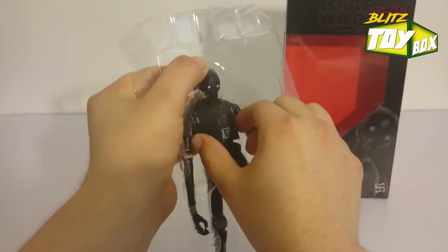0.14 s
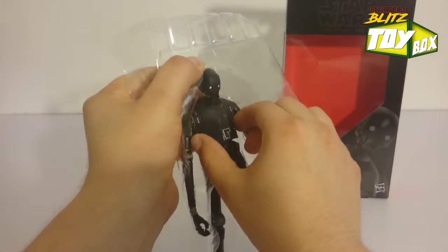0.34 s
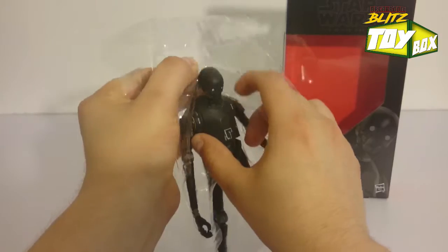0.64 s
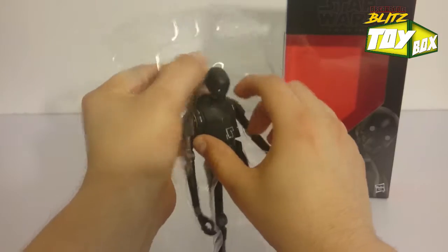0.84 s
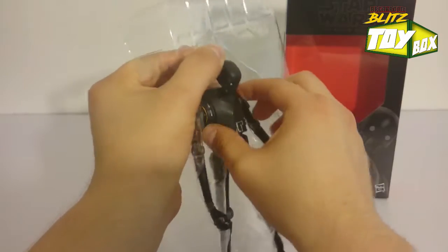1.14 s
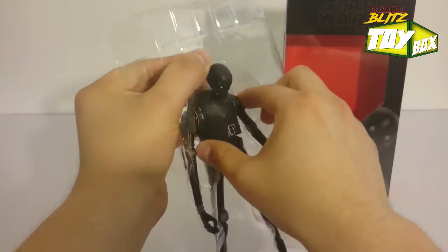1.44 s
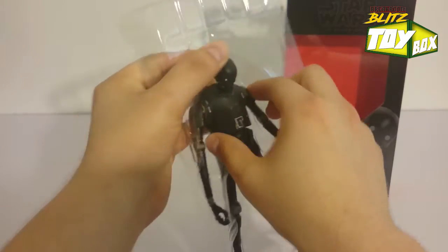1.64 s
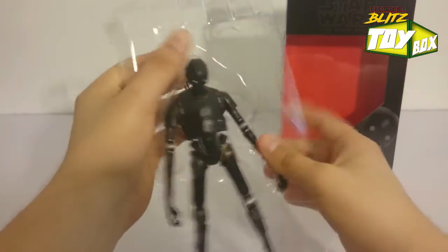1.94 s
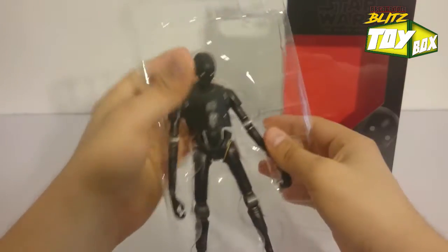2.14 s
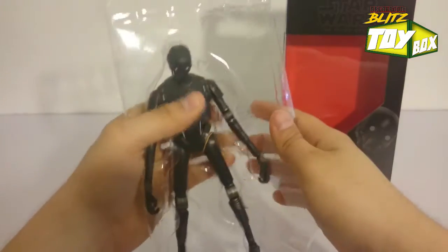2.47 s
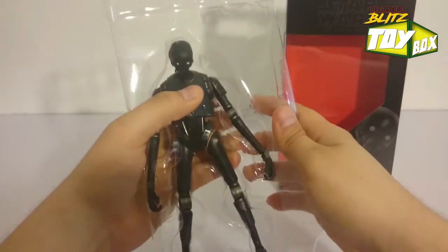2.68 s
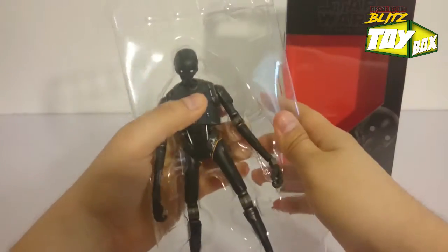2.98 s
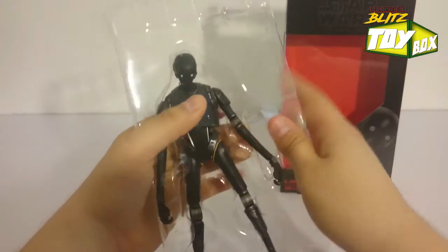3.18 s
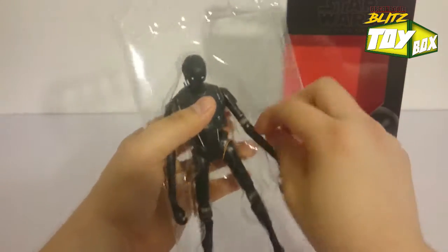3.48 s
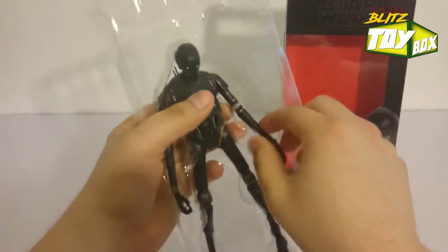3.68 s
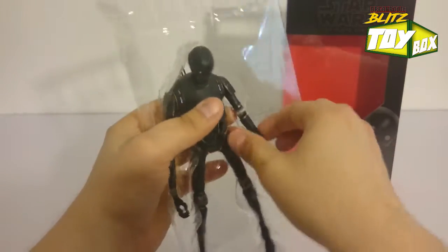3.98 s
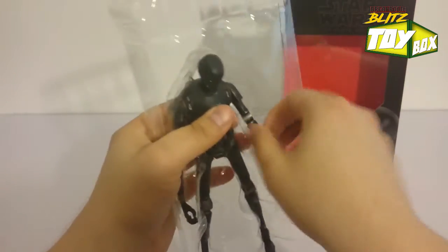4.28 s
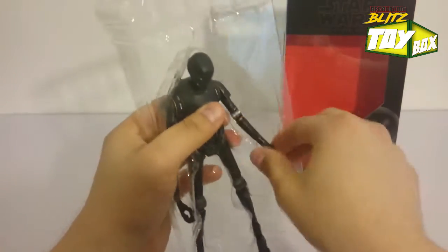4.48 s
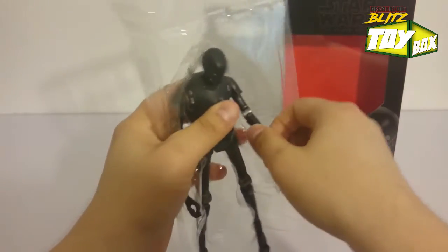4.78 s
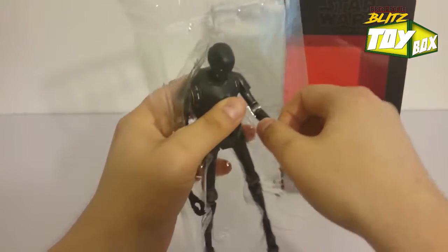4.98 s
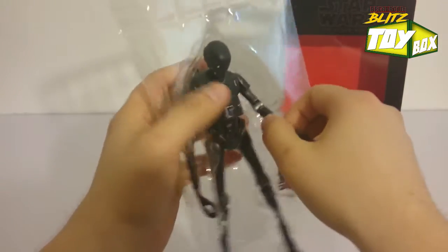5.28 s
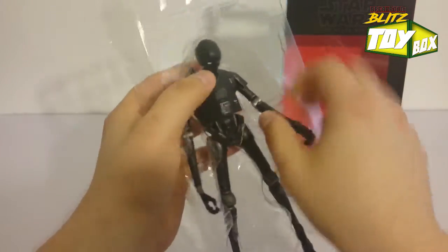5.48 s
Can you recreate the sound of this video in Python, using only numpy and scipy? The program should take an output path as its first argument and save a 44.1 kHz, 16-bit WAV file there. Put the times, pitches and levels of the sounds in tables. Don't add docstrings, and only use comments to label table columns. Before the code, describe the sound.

Brittle plastic buckles and crackles within arm's reach, in wide stereo. Hard irregular snaps with small folds and hollow thuds open the scene, ease off around two seconds, then build again to sharper, brighter cracks past three seconds with slight low bumps through the table. The last second or so is mostly light, scattered crinkling. Small indoor room, short reverberation, faint background noise, no speech.

```python
import sys
import numpy as np
from scipy import signal
from scipy.fft import rfft, irfft, next_fast_len
from scipy.io import wavfile

SR = 44100
rng = np.random.default_rng(int(sys.argv[2]) if len(sys.argv) > 2 else 0)


def field_ratio(decibels):
    return 10 ** (np.asarray(decibels, dtype=float) / 20)


def int16_out(signal):
    q = np.round(np.clip(np.atleast_2d(signal).T, -1, 1) * 32767)
    wavfile.write(sys.argv[1], SR, q.astype(np.int16))


N = 247842


def unit(x):
    return x / np.sqrt(np.mean(x ** 2) + 1e-20)


def along(points, hz):
    f, v = np.transpose(points)
    return np.interp(np.log(hz + 1), np.log(f + 1), v)


def filtered(x, response):
    m = 2 * next_fast_len(N // 2 + 4096)
    return irfft(rfft(x, m) * response(np.fft.rfftfreq(m, 1 / SR)), m)[..., :N]


def causal(db):
    cep = irfft(np.log(field_ratio(db)))
    half = len(cep) // 2
    fold = np.r_[1, np.full(half - 1, 2), 1, np.zeros(half - 1)]
    return np.exp(rfft(cep * fold))


TRAY_MODES = [600, 900, 1220, 1800, 2400, 3120, 3900, 6100]


def bursts(ring_hz, t60_s, ring_db, size=1024):
    t, f, count = np.arange(size) / SR, np.fft.rfftfreq(size, 1 / SR), len(ring_hz)
    crack = rng.standard_normal((count, 2, size))
    pick = rng.random((count, len(TRAY_MODES) + 1))
    jerks = np.repeat(rng.standard_normal((count, 1, size // 16)), 16, -1)
    spikes = field_ratio(3 * jerks)
    life = t60_s * field_ratio(6 * (pick[:, 0] - 1.5))[:, None, None]

    def dying(span):
        return rfft(crack * spikes * field_ratio(-60 * t / span) * t / span ** 2.08)

    def mode(hz):
        width = hz / 11
        return 1j * f * width / (hz ** 2 - f ** 2 + 1j * f * width)

    stiff = 1 / (1 + (3000 / (f + 1)) ** 2)
    spectrum = stiff * dying(life) + (1 - stiff) * dying(1.43 * life)
    spectrum = spectrum / (abs(spectrum) + 1e-6) ** 0.16
    tray = field_ratio(-1 - 15 * pick[:, 1:]) @ mode(np.array(TRAY_MODES)[:, None])
    panel = field_ratio(ring_db) * mode(ring_hz[:, None])
    spectrum = spectrum * (1 + tray + panel)[:, None]
    return f, spectrum / np.sqrt(np.mean(abs(spectrum) ** 2, (1, 2), keepdims=True))


# [centre f/Hz, spread over the band level/dB per Hz]
FOLD_BANDS = [(800, -17), (2700, -35), (6800, -30), (12500, -23.5)]


def balance(f, db, crisp_db, ring_hz):
    octaves = np.log2(ring_hz / 1000)
    thump = -8.5 - 0.14 * (db + 16.0) - 5 * octaves + 0.086 * crisp_db
    edge = -18.5 + 1.22 * crisp_db + 0.33 * octaves
    hz, spread_db = np.transpose(FOLD_BANDS)
    levels = db[:, None] + np.transpose([thump, 0 * db, crisp_db, edge]) + spread_db
    return np.array([along(np.transpose([hz, row]), f) for row in levels])


def laid(times, spectra, colour_db):
    even = spectra / (abs(spectra) + 1e-6) ** 0.41
    coloured = np.concatenate([spectra, even], 1) * field_ratio(colour_db)[:, None]
    lead = 64
    waves = np.roll(irfft(coloured), lead, -1)
    starts = np.round(times * SR).astype(int)[:, None]
    at = (starts + np.arange(waves.shape[-1])).ravel()
    return np.array([np.bincount(at, waves[:, k].ravel(), N + SR)[lead:N + lead] for k in range(4)])


# [f/Hz, level/dB per Hz]
HUSH_COLOUR = [(30, 6), (60, -3), (120, -14.5), (300, -7), (4800, -14), (16000, -34.5)]


def hush():
    def colour(hz):
        return field_ratio(along(HUSH_COLOUR, hz)) * (hz > 15)
    return field_ratio(-60.5) * unit(filtered(rng.standard_normal((2, N)), colour))


# [t/s, effort level/dB]
HAND_EFFORT = [(0.0, -21), (0.8, -29.5), (1.63, -39), (1.8, -62), (2.2, -35), (2.8, -37), (3.3, -23.5),
               (3.75, -38), (4.05, -29.5), (4.3, -41), (4.9, -43.5), (5.62, -51)]
# [from t/s, to t/s]
STILL_HANDS = [(0, .04), (.38, .465), (1.0, 1.022), (1.07, 1.165), (1.87, 1.965), (2.57, 2.63),
               (3.05, 3.15), (3.33, 3.35), (4.38, 4.49), (4.61, 4.69), (4.95, 5.04), (5.27, 5.3),
               (5.34, 5.43)]


def crackle(count=640):
    when, size, crisp, pitch = np.transpose(rng.random((count, 4)))
    s = (np.arange(count) + when) / count * N / SR
    db = np.interp(s, *np.transpose(HAND_EFFORT)) + 4 - 14 * size
    still = sum((s > start) & (s < end) for start, end in STILL_HANDS)
    db = db - 12 * still
    ring_hz = 1300 * 3.5 ** (2 * pitch - 1)
    crisp_db = -13.5 + 24 * (crisp - .5)
    f, spectra = bursts(ring_hz, t60_s=0.0086, ring_db=3)
    return field_ratio(47.0) * laid(s, spectra, balance(f, db, crisp_db, ring_hz))


# [t/s, peak level/dB, crispness level/dB, panel ring f/Hz]
EARLY_NICKS = [(0.0131, -31.5, -13, 1790), (0.0427, -23.5, -15, 1250), (0.0605, -25, -27, 1300),
               (0.076, -19, -14, 2410), (0.0856, -22, -13, 2910), (0.0917, -19, -24, 1940),
               (0.098, -24, -6, 820), (0.4, -27, -26, 1120), (0.49, -20.5, -16, 1260),
               (0.495, -13.5, -39, 1300), (0.5055, -16, -18, 1140), (0.61, -10.5, -13, 2480),
               (0.6294, -5.5, -8.5, 1210), (0.7191, -18, -15, 3490), (0.7594, -19.5, -5, 2730),
               (1.0475, -28, -8, 1180), (1.2617, -21, -14, 1720), (1.4766, -22.5, -23, 1700),
               (1.5187, -20, -27, 1630), (1.6331, -23, -27, 1160), (1.654, -15, -11, 1900),
               (1.737, -35, -18, 1140), (1.7662, -29, -22, 1170), (1.8049, -23.5, -8, 1040),
               (1.859, -42, -29, 1610), (1.94, -44, -27, 1170), (2.0056, -35, -26, 1420),
               (2.0314, -19.5, -33, 1790), (2.198, -36, -32, 1220), (2.311, -27, -34, 1380),
               (2.3532, -43, -5, 1740), (2.369, -47, -2, 1180), (2.487, -35, -17, 1300),
               (2.534, -32, -8, 2330), (2.6322, -32, -23, 1530), (2.6371, -29, -18, 2170),
               (2.6884, -21.5, -1, 2310), (2.72, -32, -20, 1000), (2.9332, -20.5, -23, 1360),
               (2.9421, -21, -17, 1600), (2.9474, -19, -27, 1140), (2.9638, -19.5, -11, 1730),
               (2.9791, -21, -10, 1570), (2.9926, -16, -16, 2240), (3.082, -29, -10, 1290),
               (3.139, -27, -11, 1230), (3.1849, -20, -33, 1850)]
# [t/s, peak level/dB, crispness level/dB, panel ring f/Hz]
LATE_NICKS = [(3.4683, -24, -8.5, 1140), (3.491, -16.5, -6, 1730), (3.5418, -25, -26, 995),
              (3.5937, -22.5, -9, 1180), (3.6385, -35, -8, 1800), (3.7654, -28, -11, 1054),
              (3.8026, -26, -15, 1890), (3.809, -23.5, -12.5, 1530), (3.846, -33, -20, 1860),
              (3.8701, -27, -26, 1870), (3.91, -28, -17, 1490), (3.9908, -19, -9.5, 770),
              (4.0013, -18, -23.5, 1730), (4.0073, -24, -33, 1450), (4.0272, -17, -22, 1550),
              (4.043, -20, -18, 1160), (4.109, -14, -9, 3140), (4.1149, -17.5, -21, 925),
              (4.1569, -15.5, -11, 3830), (4.18, -27.5, -21, 3490), (4.2, -32, -18, 1350),
              (4.2708, -41, -15, 1720), (4.3072, -32, -16, 1520), (4.3919, -31.5, -25, 1240),
              (4.5192, -32, -15, 1010), (4.5325, -36, -18, 1270), (4.637, -40, -27, 1310),
              (4.7308, -34.5, -31, 1290), (4.7953, -18.5, -11, 4040), (5.0193, -51, -19, 1720),
              (5.0517, -33.5, -13, 1910), (5.097, -32.5, -26, 2650), (5.343, -45, -23, 1520),
              (5.3944, -45.5, -27, 1050), (5.431, -44, -3, 1650)]


def nicks():
    s, db, crisp_db, ring_hz = np.transpose(EARLY_NICKS + LATE_NICKS)
    f, spectra = bursts(ring_hz, t60_s=0.011, ring_db=9)
    return field_ratio(49.5) * laid(s - .0006, spectra, balance(f, db, crisp_db, ring_hz))


def hump(table, shape, t60_s):
    s, db, reach_db = np.transpose(table)
    hz, shape_db = np.transpose(shape)
    ring_hz = hz[1] * 4.3 ** (rng.random(len(s)) - .5)
    f, spectra = bursts(ring_hz, t60_s=t60_s, ring_db=-3.5, size=2048)
    levels = db[:, None] + shape_db + reach_db[:, None] * (hz == hz[-1])
    colour = np.array([along(sorted(zip(hz, row)), f) for row in levels])
    return field_ratio(56) * laid(s - .0011, spectra, colour)


# [t/s, peak level/dB, air level/dB]
EDGE_TICKS = [(0.043, -39, -35), (0.097, -25.5, -23.5), (0.1455, -22, -5.5), (0.2818, -5, -38),
              (0.6312, -5, -26.5), (0.7966, -11, -41.5), (0.8174, -3.5, -34), (0.876, -8.5, -18),
              (1.045, -28, -29), (1.436, -21, -15), (1.529, -13.5, -24), (1.6638, -8.5, -19),
              (2.1236, -18.5, -15.5), (2.2182, -33.5, -3), (2.6899, -19, -41), (2.9726, -2.5, -20),
              (3.2562, -8.5, -18), (3.474, -21.5, 0.5), (3.566, -11, -17.5), (3.6163, -10, -15),
              (3.7648, -35, -37), (4.0622, -9.5, -27), (4.8593, -19.5, -10.5)]
# [f/Hz, level/dB per Hz]
TICK_COLOUR = [(3200, -51.5), (7500, -40), (13000, -24.5)]


def ticks():
    return hump(EDGE_TICKS, TICK_COLOUR, t60_s=0.01)


# [t/s, peak level/dB, depth level/dB]
TRAY_FLEXES = [(0.291, -22.5, -22), (0.469, -31.5, -30), (0.481, -26, -21), (0.514, -28, -28),
               (0.876, -22, -25.5), (1.408, -36.5, -22), (1.706, -32.5, -44), (1.977, -38, -22),
               (3.375, -24.5, -40), (3.694, -41, -17), (3.821, -36.5, -21), (4.105, -18.5, -31),
               (0.05, -36, -32.5), (0.205, -32.5, -28.5), (2.495, -36, -29), (3.77, -38.5, -14.5),
               (4.32, -40, -17.5), (5.491, -42, -18.5)]
# [f/Hz, level/dB per Hz]
FLEX_COLOUR = [(1500, -42), (463, -9.5), (129, 8.5)]


def flexes():
    return hump(TRAY_FLEXES, FLEX_COLOUR, t60_s=0.048)


# [t/s, peak level/dB, crispness level/dB, panel ring f/Hz]
PRISE_BUCKLES = [(0.0506, -18, -23, 1900), (0.065, -18.5, -18, 2400), (0.1313, -27, 0.5, 1340),
                 (0.1465, -8, -1.5, 2300), (0.2039, -7.5, -42.5, 1890), (0.229, -20.5, -5.5, 1970),
                 (0.244, -12, -22, 1690), (0.263, -8, -10, 2300), (0.2814, -6.5, -6, 2960),
                 (0.2916, 1, -14.5, 1997), (0.4802, -12, -11.5, 1380), (0.5156, -16.5, -3.5, 2370),
                 (0.5283, -11.5, -29, 2500), (0.551, -23, 3, 1130), (0.57, -15.5, -20.5, 1020),
                 (0.596, -17.5, -3.5, 1100), (0.6225, -4, -7.5, 1500), (0.6517, -8.5, -4, 1810),
                 (0.71, -3.5, -13.5, 3440), (0.749, -30, -0.5, 2260), (0.7785, -16.5, -12, 2690),
                 (0.7891, -16.5, -10, 1850), (0.83, -14, -16, 1020), (0.8392, -7, -13, 1300),
                 (0.8552, -8, -20, 2630), (0.865, -6.5, -10, 880), (0.8772, -5.5, -0.5, 2430),
                 (0.8857, -2, -11.5, 1140), (0.9358, -18, -15.5, 2580)]
# [t/s, peak level/dB, crispness level/dB, panel ring f/Hz]
TWIST_BUCKLES = [(1.028, -16, -18, 1170), (1.053, -29, -22, 920), (1.134, -31.5, -34, 1500),
                 (1.1686, -12.5, -27, 1340), (1.2423, -20.5, -14, 1520), (1.2731, -4, -5, 2670),
                 (1.338, -15.5, -14, 1920), (1.3789, -17, -13, 2380), (1.4079, -11.5, -27, 1100),
                 (1.4277, -21.5, -13, 1600), (1.452, -9.5, -3.5, 1410), (1.509, -19.5, -34, 1900),
                 (1.527, -13, -28, 2020), (1.5372, -18, -23, 3650), (1.5913, -8, -21.5, 3100),
                 (1.6125, -14.5, -13, 3100), (1.623, -10, -15, 3160), (1.646, -16.5, -19, 1810),
                 (1.6645, -16.5, -1.5, 1600), (1.6958, -8.5, -24, 1105), (1.706, -9.5, -14, 1140),
                 (1.8075, -23.5, -24.5, 1710)]
# [t/s, peak level/dB, crispness level/dB, panel ring f/Hz]
REGRIP_BUCKLES = [(1.9679, -23.5, -8.5, 890), (1.9768, -28.5, -8, 920), (1.9837, -17.5, -58, 1260),
                  (2.026, -21, -15, 1270), (2.037, -20.5, -8, 1280), (2.0798, -16.5, -14, 1400),
                  (2.1243, -12, -14, 1270), (2.176, -26, -34, 1270), (2.1907, -31, -6.5, 1110),
                  (2.2194, -19.5, -8, 1280), (2.293, -28, -22, 1840), (2.301, -39, -3, 1100),
                  (2.3783, -25.5, -7.5, 1040), (2.388, -21, -22, 1800), (2.42, -25.5, -20, 1300),
                  (2.5465, -18.5, -7, 2120), (2.563, -36, -11, 1190), (2.608, -38.5, -22, 1690),
                  (2.647, -33.5, -20, 930), (2.668, -18.5, -12, 1170), (2.699, -17.5, -16, 1870),
                  (2.73, -42, -25, 1180)]
# [t/s, peak level/dB, crispness level/dB, panel ring f/Hz]
BEND_BUCKLES = [(2.7504, -17.5, -5.5, 3770), (2.803, -21, -32, 1730), (2.8263, -20.5, -12, 1800),
                (2.8357, -16.5, -36, 1820), (2.854, -15, -19.5, 1220), (2.8693, -16.5, 5, 3800),
                (2.8817, -11, -13, 5800), (2.8915, -9.5, -15, 3870), (2.9055, -19.5, -17, 1030),
                (2.9704, -4, -15, 2370), (3.0003, -23.5, -25, 1210), (3.0186, -18.5, -33, 2550),
                (3.044, -20.5, -39.5, 1130), (3.108, -27, -40, 1190), (3.1523, -15, -22.5, 1870),
                (3.1724, -26, -11.5, 1790), (3.1997, -19.5, -11.5, 1300), (3.2337, -19, -7.5, 2450),
                (3.2564, -14.5, 5.5, 4050), (3.2789, -15.5, -16, 1830), (3.3548, -13.5, -2, 4370),
                (3.3743, -18.5, 3, 3550), (3.3834, -16.5, -14.5, 3940), (3.3936, -15, -2, 2980),
                (3.4208, -7.5, -5, 3720)]
# [t/s, peak level/dB, crispness level/dB, panel ring f/Hz]
PULL_BUCKLES = [(3.4745, -18.5, 3, 1130), (3.479, -2, -5, 3780), (3.5794, -11.5, -1, 6100),
                (3.615, -21.5, 8.5, 5770), (3.676, -17, -14.5, 1690), (3.6929, -23.5, -6, 3800),
                (3.732, -24, -18, 1480), (3.7715, -25.5, -14.5, 1600), (3.7795, -19, -9.5, 3760),
                (3.788, -25, -18, 3800), (3.8217, -25.5, -25, 1870), (3.8548, -25.5, -11.5, 1820),
                (3.8803, -23.5, -29.5, 870), (3.8885, -32.5, -24, 1350), (3.906, -28.5, -5.5, 1480),
                (3.9344, -29.5, -5.5, 2000), (3.9443, -19, -34, 1850), (3.9841, -23, -28.5, 1500),
                (3.9859, -17.5, -22, 1790), (4.015, -22, -11.5, 1730), (4.031, -16.5, -8.5, 1280),
                (4.0491, -12, -5.5, 2920), (4.0621, -12.5, 4.5, 3950), (4.0734, -9, -9.5, 3080),
                (4.0814, -11, 2, 3040), (4.106, -6, 1.5, 1820), (4.136, -12.5, -6, 3780)]
# [t/s, peak level/dB, crispness level/dB, panel ring f/Hz]
LOOSEN_BUCKLES = [(4.234, -34, -21, 1413), (4.2901, -30, -19, 1410), (4.318, -27, -14.5, 1210),
                  (4.3455, -25.5, -16, 1530), (4.444, -42, -27, 1650), (4.493, -34.5, -36.5, 1230),
                  (4.5116, -21, -13.5, 2130), (4.5385, -23, -19, 997), (4.5832, -28, -26, 830),
                  (4.6989, -26.5, -11, 1820), (4.7114, -28.5, -26.5, 1680), (4.7559, -29.5, -15, 1200),
                  (4.787, -5, -2.5, 3930), (4.83, -25, 3.5, 3900), (5.0469, -41, -12, 1920),
                  (5.061, -41.5, -0.5, 2010), (5.087, -34, -19.5, 1200), (5.165, -19, -14, 1300),
                  (5.1794, -28, -8, 1215), (5.2177, -22.5, -16, 1510), (5.249, -28.5, -11, 1230),
                  (5.259, -19, -18, 1950), (5.269, -27.5, -11, 1195), (5.332, -31.5, -15.5, 1204),
                  (5.4459, -32.5, -16, 1880), (5.475, -31, -19, 1110), (5.4912, -33, -11, 984),
                  (5.5388, -17, -26, 2300)]


def snaps(count=6):
    opening = PRISE_BUCKLES + TWIST_BUCKLES + REGRIP_BUCKLES
    freeing = BEND_BUCKLES + PULL_BUCKLES + LOOSEN_BUCKLES
    s, db, crisp_db, ring_hz = np.transpose(opening + freeing)
    f, spectra = bursts(ring_hz, t60_s=0.014, ring_db=5)
    colour = balance(f, db, crisp_db, ring_hz)
    wait, drop, bend = np.transpose(rng.random((len(s), count, 3)), (2, 0, 1))
    after = np.abs(s[:, None] - .003 + 0.042 * wait ** 1.3).ravel()
    weaker = colour[:, None] - 9 - 12 * drop[..., None] - 12 * wait[..., None]
    weaker = weaker.reshape(len(after), -1)
    small_ring_hz = (ring_hz[:, None] * 3 ** (bend - .5)).ravel()
    _, followers = bursts(small_ring_hz, t60_s=0.013, ring_db=12.0)
    return field_ratio(51) * (laid(s - .0005, spectra, colour) + laid(after, followers, weaker))


# [t/s, peak level/dB, pitch f/Hz]
HOLLOW_BOOMS = [(0.06, -31, 654), (0.105, -32, 555), (0.15, -34.5, 670), (0.478, -24.5, 292),
                (0.5, -34.5, 258), (0.522, -38.5, 300), (0.655, -36, 280), (0.872, -27, 270),
                (0.894, -24, 279), (1.17, -46, 300), (3.365, -32.5, 640), (3.385, -25, 706),
                (3.41, -34, 650), (3.679, -40, 298), (3.889, -38.5, 290), (3.92, -39.5, 600),
                (4.33, -47, 550)]


def hollow(rise_s=0.003, cycles=22):
    t, out = np.arange(8192) / SR, np.zeros(N + SR)
    for s, db, hz in HOLLOW_BOOMS:
        swell = field_ratio(db - 60 * t * hz / cycles) * (1 - np.exp(-t / rise_s))
        out[round(s * SR):][:len(t)] += swell * np.sin(2 * np.pi * hz * t)
    return out[:N] * np.array([[4], [2], [.1], [.1]])


# [t/s, peak level/dB]
TABLE_JOLTS = [
    (0.292, -51),
    (3.615, -46.5),
    (1.705, -60),
    (2.972, -37),
    (3.255, -47),
    (3.48, -29.5),
    (4.05, -41),
    (4.106, -32.5),
    (4.786, -59),
]


def jolts(push_s=0.00048):
    u, out = np.arange(512) / SR / push_s, np.zeros(N)
    for s, db in TABLE_JOLTS:
        out[round(s * SR):][:len(u)] += field_ratio(db + 9.0) * u * np.exp(-u)
    return out


# [f/Hz, level/dB]
SQUEAK_MODES = [(600, -33), (1350, -34), (3050, -27), (6000, -44)]


def squeak(start_s=2.491, length_s=0.021):
    t = np.arange(N) / SR
    swell = np.sin(np.pi * np.clip((t - start_s) / length_s, 0, 1)) ** 2
    waver = np.cumsum(rng.standard_normal((len(SQUEAK_MODES), N)), 1) * 0.0544
    tone = np.zeros(N)
    for (hz, db), wander in zip(SQUEAK_MODES, waver):
        tone += swell * field_ratio(db) * np.sin(2 * np.pi * hz * t + wander)
    return tone * np.array([[1], [.5], [.06], [.06]])


# [f/Hz, t60/s]
ROOM_DECAY = [(300, 0.33), (900, 0.23), (4000, 0.25), (14600, 0.19)]
# [f/Hz, level/dB]
TO_WALLS = [(1000, 0), (5000, 0), (9000, -0.5), (13000, 5.5)]


def room(push, step=8192):
    x = filtered(push, lambda hz: field_ratio(along(TO_WALLS, hz)))
    out = np.zeros((2, N + SR))
    for start in range(0, N, step):
        hz, t, z = signal.stft(rng.standard_normal((2, SR // 2)), SR, nperseg=256)
        decay = field_ratio(-60 * t / along(ROOM_DECAY, hz)[:, None])
        tail = signal.istft(z * decay, SR, nperseg=256)[1]
        age_s = np.arange(tail.shape[1]) / SR
        tail = tail * (1 - 0.15 * np.exp(-age_s / 0.023))
        wet = signal.fftconvolve(x[:, start:start + step], tail / np.linalg.norm(tail[0]), axes=1)
        out[:, start + 90:][:, :wet.shape[1]] += wet
    return out[:, :N]


# [f/Hz, level/dB]
LEFT_PORT = [(60, -12.5), (180, -14), (270, -12.5), (380, -11), (600, -7), (930, 7.5), (1300, -1),
             (2600, 2), (3000, -1.5), (4800, 0.5), (6300, 5.5), (9500, 4), (11500, -8), (15500, -15.5)]
# [f/Hz, level/dB]
RIGHT_PORT = [(60, -21.5), (270, -8), (380, -9), (520, 1.5), (800, 5.5), (930, 12), (1300, 10), (2300, 6.5),
              (4000, 9), (4700, -1), (8500, -3.5), (12500, -4.5), (15500, -7.5)]
# [f/Hz, likeness 0-1]
LIKENESS = [(60, 0.6), (200, 1), (1000, 0.93), (1800, 0.67), (3000, 0), (8000, 0)]
# [f/Hz, phase/rad]
RIGHT_LAG = [(900, 0.5), (1500, 1.41), (2600, 4.9), (16000, 26.63)]


def ports(pair):
    def response(hz):
        left_db, right_db = along(LEFT_PORT, hz), along(RIGHT_PORT, hz)
        turn = np.arccos(np.clip(along(LIKENESS, hz), 0, 1)) / 2
        tilt = field_ratio((left_db - right_db) / 2) * np.exp(.5j * along(RIGHT_LAG, hz))
        body = causal((left_db + right_db) / 2)
        left, right = body * tilt, -body / tilt
        return np.array([[left * np.cos(turn), left * np.sin(turn)],
                         [right * np.cos(turn), -right * np.sin(turn)]])
    return filtered(pair, response).sum(1)


def scene():
    plastic = crackle() + nicks() + ticks() + flexes() + snaps() + hollow() + squeak()
    close, push = plastic[:2], plastic[2:]
    return ports(close + field_ratio(-4.0) * room(push)) + jolts() + hush()


def low_pass(x):
    return signal.sosfilt(signal.butter(12, 16800, fs=SR, output="sos"), x)


def record(dry):
    ceiling, hardness = 1.0, 5
    held = dry / (1 + abs(dry / ceiling) ** hardness) ** (1 / hardness)

    def band(hz):
        top = field_ratio(-.035 * np.clip(hz - 15750, 0, 1100))
        return top * 1j * hz / (1j * hz + 120)

    mix = filtered(held, band)
    return low_pass(mix)


dry = scene()
out = record(dry)
int16_out(out)
```